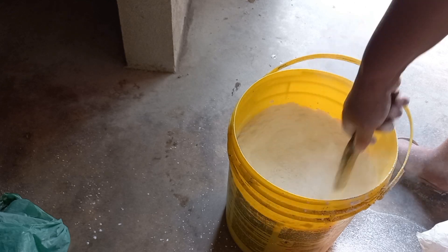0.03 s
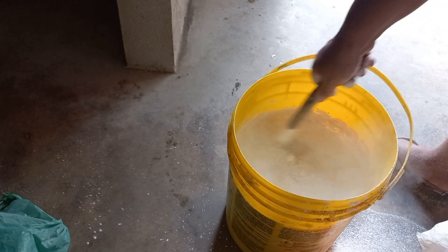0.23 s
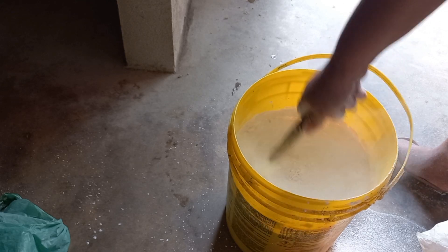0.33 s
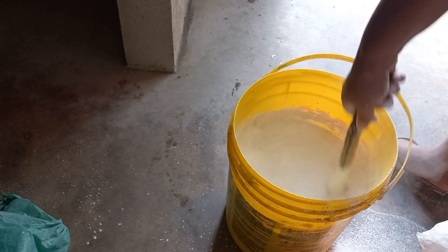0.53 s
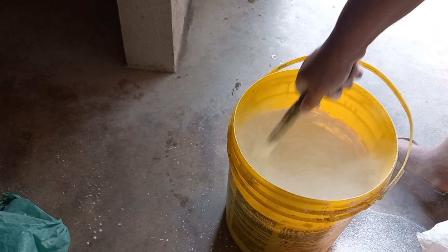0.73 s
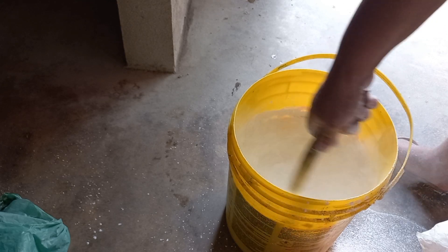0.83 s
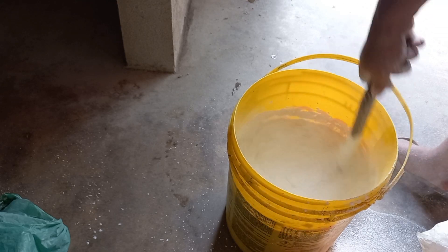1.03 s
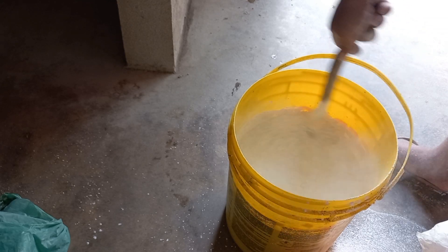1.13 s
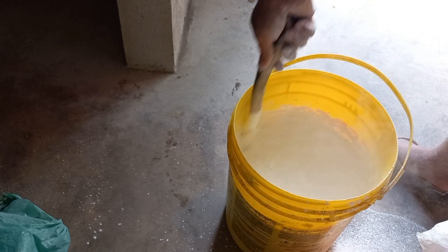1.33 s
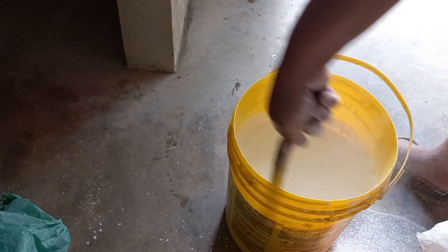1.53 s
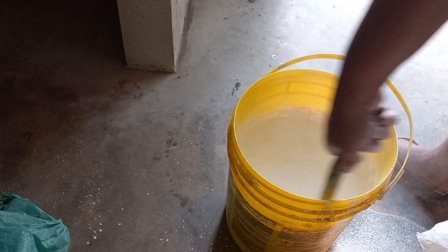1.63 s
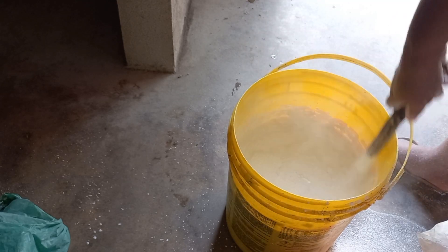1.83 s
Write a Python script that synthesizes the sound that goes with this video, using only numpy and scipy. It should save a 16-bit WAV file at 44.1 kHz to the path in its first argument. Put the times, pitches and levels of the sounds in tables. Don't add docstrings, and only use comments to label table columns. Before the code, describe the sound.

A wooden stick stirs thick liquid in a plastic bucket. The loudest hollow knock comes at 0.24 s, with others at 0.4 and 0.69 s, each booming briefly around 400 Hz, with wet gritty drags at 0.4-0.5 and 0.7-0.87. Afterwards come fine swishes, faint scrapes, a light tap at 1.55, a low left-side thud at 1.65 and a tiny snap at 1.86, over faint hum and rumble.

```python
import sys
import numpy as np
from scipy import signal
from scipy.fft import rfft, irfft, next_fast_len
from scipy.io import wavfile
from scipy.ndimage import uniform_filter1d, map_coordinates

SR = 44100
rng = np.random.default_rng(int(sys.argv[2]) if len(sys.argv) > 2 else 0)


def ratio(d):
    e = np.asarray(d, float) / 20
    return 10 ** e


def wav_out(sig):
    wavfile.write(sys.argv[1], SR, np.round(np.clip(np.atleast_2d(sig).T, -1, 1) * 32767).astype(np.int16))


N = 83790

# start_s, peak_db, pitch_hz, length_s, higher_mode_db
AIR_BOOMS = [(0, -30, 406, 0.015, -12.5), (0.012, -37.5, 397.4, 0.038, -24), (0.048, -44, 390, 0.046, -16),
             (0.094, -42, 371, 0.011, -9), (0.207, -38, 372, 0.0058, -11), (0.237, -15.5, 399.9, 0.05, -5),
             (0.314, -24, 403.7, 0.013, -14.5), (0.399, -17.5, 387.5, 0.027, -8),
             (0.464, -31, 394, 0.024, -11), (0.687, -19, 404.3, 0.048, -9), (0.696, -32, 397.5, 0.019, -14),
             (0.761, -35, 413, 0.017, -14), (0.802, -32, 381, 0.022, -10), (0.828, -36, 386, 0.018, -2),
             (1.171, -38, 375.5, 0.015, -10), (1.203, -44.5, 390, 0.021, -9), (1.391, -44, 384, 0.023, -5),
             (1.702, -40, 399, 0.0093, -4), (1.865, -38.5, 384, 0.013, -6.5)]
# start_s, end_s, level_db, centre_hz, pitch_scatter_octaves
WALL_SWEEPS = [(0, 0.041, -55.5, 1390, 0.54), (0.239, 0.306, -56, 1330, 0.47),
               (0.395, 0.494, -50.5, 1294, 0.4), (0.426, 0.47, -55, 2233, 0.11),
               (0.478, 0.493, -47.5, 1554, 0.175), (0.692, 0.866, -54.5, 1190, 0.34),
               (0.944, 0.973, -55, 1670, 0.2), (1.039, 1.112, -62, 1710, 0.053),
               (1.422, 1.598, -65, 1715, 0.088), (1.598, 1.754, -62.5, 1503, 0.33),
               (1.664, 1.915, -67.5, 963, 0.077)]
# centre_hz, width_hz, level_db
WALL_MODES = [(247, 66.4, 9.5), (390, 37, 12.5), (511, 42, 10.5), (632, 125, 2), (960, 340, -6.5),
              (1030, 150, 1), (1550, 520, -11), (2200, 660, -9), (3500, 2100, -14.5)]
# centre_s, half_length_s, swell_db
LIQUID_TURNS = [(0.003, 0.027, 7), (0.148, 0.015, 2), (0.287, 0.077, 5.5), (0.427, 0.081, 4.5),
                (0.611, 0.08, 4), (0.768, 0.085, 7.5), (0.98, 0.11, 4.5), (1.19, 0.061, 6),
                (1.403, 0.056, 1.5), (1.677, 0.056, 6), (1.884, 0.029, 2)]
# freq_hz, level_db (per Hz)
HISS_COLOUR = [(560, -17.5), (1000, -10), (1640, -9), (2290, -11), (2470, -9.5), (3160, -9), (8280, -11),
               (12300, -10), (15700, -12)]
# pitch_hz, level_db
HUM_LINES = [(240, -65), (300, -69), (361, -59.5), (481, -63.5)]
# end_s, swell_s, pitch_hz, level_db
PASSING_TONES = [
    (1.7, 0.077, 1300, -71),
    (1.645, 0.13, 1315, -57.5),
    (1.4, 0.055, 1500, -58.5),
]
# freq_hz, level_db (per Hz)
RUMBLE_COLOUR = [(25, -14), (50, 3), (80, 5), (130, 3.5), (260, -5.5)]
# freq_hz, level_db (per Hz)
ROOM_COLOUR = [(88, -56), (150, -39), (240, -10), (390, -1.5), (441, -7), (487, -8), (566, -14.5),
               (1170, -32), (3000, -36), (3900, -96), (6600, -120)]
# centre_s, level_db, pitch_hz, length_s
GRIT_CATCHES = [(0.064, -45, 910, 0.0026), (.18, -54, 1184, 0.0029), (0.43, -41, 249.4, 0.014),
                (.456, -43, 217, 0.0048), (0.702, -44, 217, 0.011), (0.762, -40, 222, 0.0084),
                (0.406, -36, 1514, 0.0036), (.412, -38, 1420, 0.0024), (.42, -36.5, 965, 0.0029),
                (0.433, -46, 2475, 0.0025), (0.445, -47, 2050, 0.0032), (.451, -46.5, 2200, 0.0036),
                (0.46, -46, 2380, 0.0044), (0.464, -52, 1510, 0.0027), (.483, -52, 1540, 0.0034),
                (0.489, -46.5, 1490, 0.0045), (0.707, -35, 986, 0.0038), (0.733, -36.5, 885, 0.0032),
                (0.767, -43, 1080, 0.0024), (0.813, -40.5, 960, 0.0086), (.793, -45, 975, 0.0038),
                (0.863, -47.5, 1100, 0.0021), (0.859, -51, 1720, 0.0035), (.935, -54, 1750, 0.0034),
                (0.951, -47, 1630, 0.0042), (0.986, -56, 1710, 0.0046), (0.98, -56, 1020, 0.0045),
                (1.01, -58, 1340, 0.0032), (1.046, -57.5, 970, .004), (1.06, -59, 1760, 0.0031),
                (1.087, -55.5, 1650, 0.0027), (1.088, -56, 2150, .003), (1.107, -63, 1760, 0.0034),
                (1.321, -61, 1176, .009), (1.355, -57, 2440, 0.0037), (1.445, -63, 1670, 0.0037),
                (1.484, -61, 1670, .004), (1.501, -55, 1700, 0.0039), (1.528, -59, 1680, 0.0036),
                (1.661, -55, 1260, 0.0026), (1.674, -52.5, 1490, 0.0031), (1.687, -57, 970, 0.0082),
                (1.69, -53, 1630, .004), (1.762, -55.5, 1070, 0.0042), (1.809, -56.5, 960, 0.0056),
                (1.868, -57.5, 960, 0.0078), (1.895, -54, 930, 0.0052)]
# centre_s, peak_db, pitch_hz, length_s, left_over_right_db
SOFT_THUDS = [(.085, -48, 87, 0.011, -5), (.14, -47, 73.5, 0.0093, -12), (.295, -47.5, 75, 0.0082, -7),
              (.46, -58.5, 60.5, 0.01, -8), (.352, -42.5, 93, 0.0088, -7), (.83, -52.5, 92, 0.0075, -1),
              (.918, -32, 86.4, 0.0072, -4.5), (1.308, -45, 69, 0.011, -2.5), (1.385, -51, 104, 0.014, -16),
              (1.505, -47, 82.4, 0.0079, 24), (1.617, -33.5, 113, 0.0033, 40),
              (1.646, -23.5, 92, 0.0076, 48), (1.646, -35.5, 193.5, 0.013, 31),
              (.91, -42.5, 147, 0.0079, 4), (0.954, -51, 56, 0.019, -10), (1.74, -48, 98, 0.039, 24),
              (1.803, -39.5, 69, 0.02, 31), (1.86, -37, 110, 0.0058, 45)]
# start_s, peak_db, pitch_hz, ring_t60_s, crack_db
STICK_TAPS = [(0.175, -56, 1094, 0.088, -30), (0.222, -40, 1720, 0.0054, 13.5),
              (0.2377, -15, 1493, 0.014, -6), (.244, -32, 2210, 0.033, 7), (0.308, -40.5, 1020, 0.036, -30),
              (0.3984, -31, 1666, 0.036, -15), (.402, -34, 976, 0.062, -32),
              (0.628, -41.5, 1605, 0.041, -40), (0.675, -42.5, 1270, 0.044, -43),
              (0.6886, -25.5, 1673, 0.029, 5), (0.689, -30.5, 960, 0.024, -30),
              (0.753, -35, 970, 0.042, -32), (0.76, -35, 2200, 0.018, -20),
              (0.8045, -46.5, 965, 0.073, -30), (.833, -39, 1820, 0.041, -25), (0.949, -44, 1310, 0.032, 7),
              (1.041, -58, 1700, 0.056, -39), (1.131, -47, 1640, 0.037, -24),
              (1.549, -42, 1685, 0.024, -24)]
# centre_s, level_db, pitch_hz, length_s, left_over_right_db
BRIGHT_SNAPS = [
    (.2145, -44, 3000, .0006, 9),
    (.2225, -38, 6170, 0.00034, 10),
    (.2455, -38.5, 7350, 0.00031, -2),
    (.2455, -49, 3300, 0.00044, 3),
    (.263, -45, 7600, .0005, 0),
    (.239, -31.5, 2730, 0.00044, 4),
    (0.687, -41.5, 6540, 0.00036, 3),
    (1.857, -32, 10480, 0.00014, -10),
]
# freq_hz, share
WALL_SPREAD = [(420, 0), (600, .5), (2500, .6)]
# freq_hz, t60_s
ROOM_DECAY = [(200, 0.47), (1500, 0.26), (8000, 0.11)]


def unit(x):
    return x / np.sqrt(np.mean(x ** 2) + 1e-20)


def along(points, hz):
    f, v = np.transpose(points)
    return np.interp(np.log(hz + 1), np.log(f + 1), v)


def wobble(rate):
    points = rng.standard_normal(int(N * rate / SR) + 4)
    return map_coordinates(points, [np.arange(N) * rate / SR])


def filtered(x, response):
    m = next_fast_len(N + SR // 2)
    return irfft(rfft(x, m) * response(np.fft.rfftfreq(m, 1 / SR)), m)[..., :N]


def noise(colour):
    def response(f):
        inside = (f >= colour[0][0]) * (f <= colour[-1][0])
        return ratio(along(colour, f)) * inside
    return unit(filtered(rng.standard_normal((2, N)), response))


def pan(db):
    return ratio(np.minimum([[db], [-db]], 0))


def pulses(events):
    t = np.arange(N) / SR
    out = np.zeros((2, N))
    for centre, db, hz, length, side_db in events:
        bell = np.exp(-((t - centre) / length) ** 2 / 2)
        out += ratio(db) * pan(side_db) * bell * np.cos(2 * np.pi * hz * (t - centre))
    return out


def wall(f):
    total = 0
    for k, (centre, width, db) in enumerate(WALL_MODES):
        push = 1j * f * width
        total = total + (-1) ** k * ratio(db) * push / (centre * centre - f * f + push)
    return total


def booms():
    rise_s, fall_power, sag = 0.006, 3.5, 0.0117
    out = np.zeros(N + SR)
    t = np.arange(SR // 4) / SR
    for start, db, hz, length, higher_db in AIR_BOOMS:
        rise = 1 - np.exp(-t / rise_s) * (start > 0)
        hold = np.exp(-(t / length) ** fall_power)
        air = hold * np.sin(2 * np.pi * hz * t * (1 - sag * t / length))
        higher = ratio(higher_db) * np.exp(-t / 0.017) * np.sin(2 * np.pi * 1.16 * hz * t)
        lower = ratio(-36.5) * np.exp(-t / length) * np.sin(2 * np.pi * 0.6 * hz * t)
        out[round(start * SR):][:len(t)] += ratio(db) * rise * (air + higher + lower)
    return out[:N]


def drag():
    count, grains_per_s, grain_samples = 220, 850, 700
    spread_db, cycles, edge_s = 1.7, 6.6, 0.0079
    grains, rub = np.zeros(N), np.zeros(N)
    t = np.arange(N) / SR
    life = np.arange(grain_samples) / SR
    for start, end, db, centre_hz, octaves in WALL_SWEEPS:
        when, size = rng.random((2, count, 1))
        pitch = centre_hz * 2 ** (octaves * rng.standard_normal((count, 1)))
        first = ((start + when * count / grains_per_s) * SR).astype(int)
        at = first + np.arange(grain_samples)
        age = life * pitch / cycles * 2
        strength = ratio(-spread_db * np.log(size + 0.005))
        grain = strength * age * np.exp(-age) * np.sin(2 * np.pi * pitch * life)
        gate = ratio(db) * np.clip(np.minimum(t - start, end - t) / edge_s + 0.5, 0, 1)
        grains += gate * np.bincount(at.ravel(), grain.ravel(), N + SR)[:N]
        rub += gate * octaves ** 2
    shudder = rub * ratio(29 + 6.3 * wobble(29.5)) * rng.standard_normal(N)
    return grains + filtered(shudder, wall)


def swish():
    t = np.arange(N) / SR
    swell_db = sum(db * np.exp(-((t - centre) / half) ** 2) for centre, half, db in LIQUID_TURNS)
    return ratio(-57 + swell_db + 0.77 * wobble(18)) * noise(HISS_COLOUR) * pan(-3)


def hum():
    t = np.arange(N) / SR
    out = np.zeros(N)
    for hz, db in HUM_LINES:
        level = ratio(db + 4 * wobble(13.12))
        out += level * np.sin(2 * np.pi * hz * t + 1.2 * wobble(18))
    return out


def whine():
    t = np.arange(N) / SR
    out = np.zeros(N)
    for end, swell_s, hz, db in PASSING_TONES:
        swell = np.exp(-((end - t) / swell_s) ** 2) * np.clip((end - t) / 0.013, 0, 1)
        level = ratio(db + wobble(67.0))
        out += level * swell * np.sin(2 * np.pi * hz * t + 0.564 * wobble(89))
    return out


def room():
    t = np.arange(N) / SR
    lull_db = -22 * np.exp(-((t - 0.64) / 0.054) ** 2)
    lumps_db = 5.5 * np.array([wobble(8.32), wobble(8.84)])
    rumble = ratio(-67 + lull_db + lumps_db) * noise(RUMBLE_COLOUR)
    floor = ratio(-61 + 2.1 * wobble(19.0)) * noise(ROOM_COLOUR)
    return (hum() + whine()) * pan(-2) + rumble + floor


def grit():
    t = np.arange(N) / SR
    out = np.zeros(N)
    for centre, db, hz, length in GRIT_CATCHES:
        bell = np.exp(-((t - centre) / length) ** 2)
        out += ratio(db) * bell * np.sin(2 * np.pi * hz * (t - centre))
    return out


def thuds():
    return pulses(SOFT_THUDS)


def taps():
    crack_t60_s, crack_hz, shiver_t60_s, shiver_db = 0.0092, 2620, 0.23, -8.5
    rise_s, roughness, sag = 0.00026, 0.45, 0.05
    ring, crack, shiver = np.zeros((3, N + SR))
    t = np.arange(SR // 4) / SR
    for start, db, hz, t60, crack_db in STICK_TAPS:
        chance = rng.standard_normal((3, len(t)))
        first = round(start * SR)
        at = slice(first, first + len(t))
        rough = roughness * unit(uniform_filter1d(chance[2], size=90))
        tone = np.sin(2 * np.pi * hz * t * (1 - sag * t / t60) + rough)
        ring[at] += ratio(db - 60 * t / t60) * (1 - np.exp(-t / rise_s)) * tone
        crack[at] += ratio(db + crack_db - 60 * t / crack_t60_s) * chance[0]
        shiver[at] += ratio(db + shiver_db - 60 * t / shiver_t60_s) * chance[1]

    def dull(f):
        return 1j * f / (600 + 1j * f) / (1 + 1j * f / crack_hz) ** 2

    ring = filtered(ring[:N], lambda f: f > 500)
    return ring + filtered(crack[:N], dull) + filtered(shiver[:N], wall)


def ticks():
    return pulses(BRIGHT_SNAPS)


def echo(x):
    hz, t, z = signal.stft(rng.standard_normal((2, SR // 2)), SR, nperseg=256)
    fade = ratio(-60 * t / along(ROOM_DECAY, hz)[:, None])
    tail = signal.istft(z * fade, SR, nperseg=256)[1]
    tail = tail / np.linalg.norm(tail[0])
    delayed = np.pad(x, (300, 0))[None]
    return signal.fftconvolve(delayed, tail, axes=1)[:, :N]


def scene():
    air = booms()
    stick = drag() + grit() + taps()

    def lag(f):
        return np.exp(1j * np.pi * 0.00007 * f * np.array([[-1], [1]]))

    def late(f):
        return along(WALL_SPREAD, f) * np.exp(-2j * np.pi * f * 0.001262)

    direct = filtered(air + stick, lag) * pan(-2)
    wide = filtered(stick, late) * [[1], [-1]]
    wet = echo(ratio(-21) * air + ratio(-10) * stick)
    return direct + wide + wet + swish() + room() + thuds() + ticks()


def top_cut(x):
    return signal.sosfilt(signal.butter(12, 15820, fs=SR, output="sos"), x)


def record(dry):
    mix = filtered(dry, lambda hz: hz < 15800)
    return top_cut(mix)


dry = scene()
out = record(dry)
wav_out(out)
```